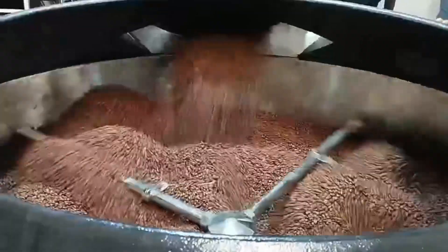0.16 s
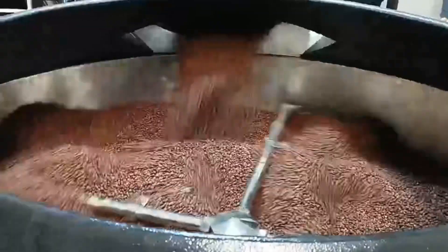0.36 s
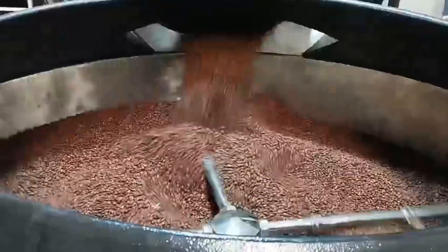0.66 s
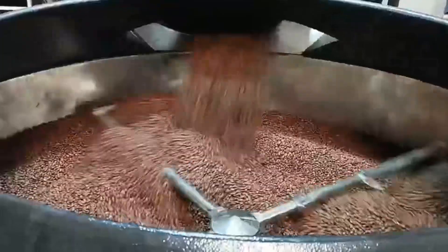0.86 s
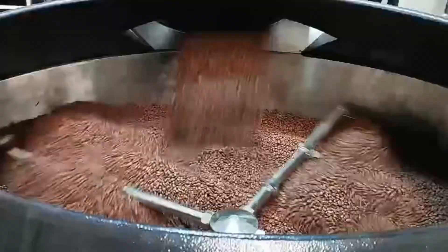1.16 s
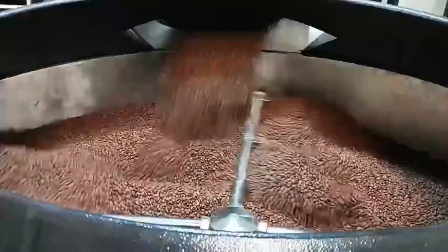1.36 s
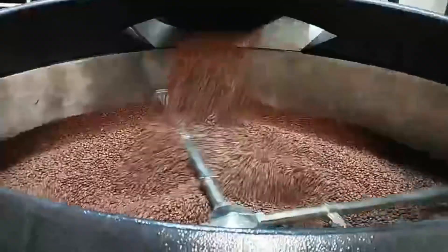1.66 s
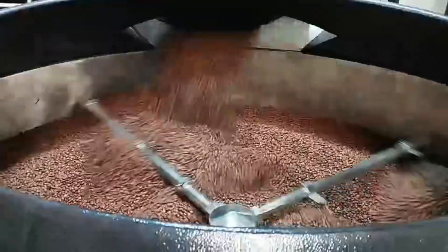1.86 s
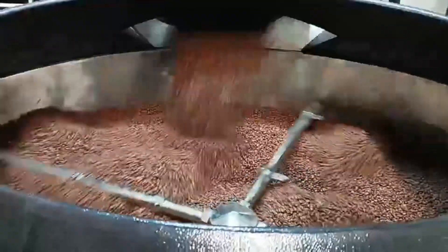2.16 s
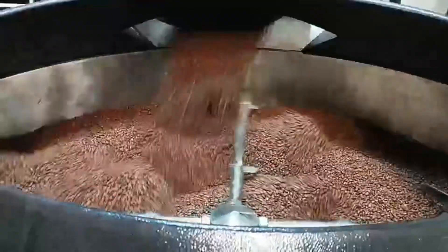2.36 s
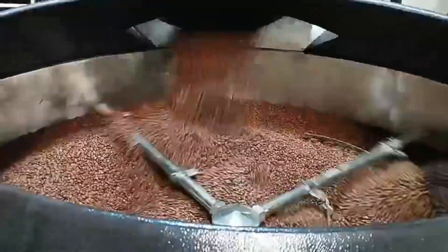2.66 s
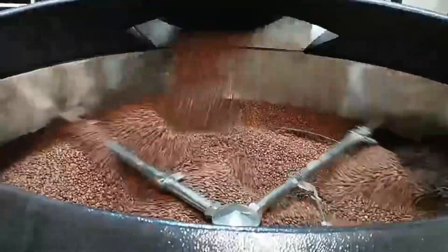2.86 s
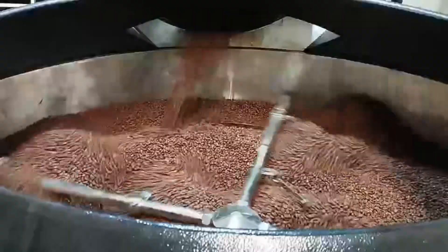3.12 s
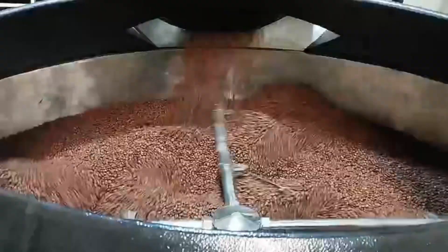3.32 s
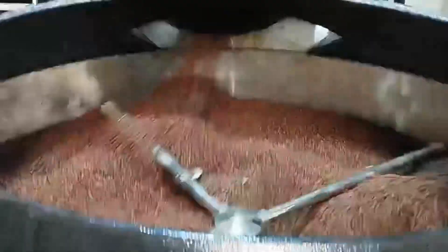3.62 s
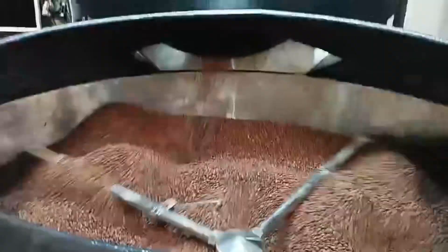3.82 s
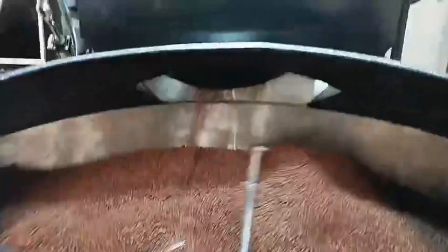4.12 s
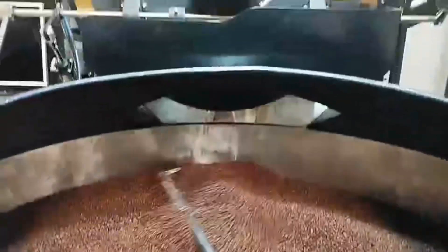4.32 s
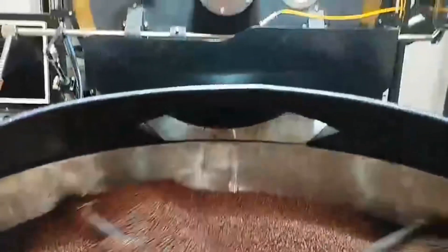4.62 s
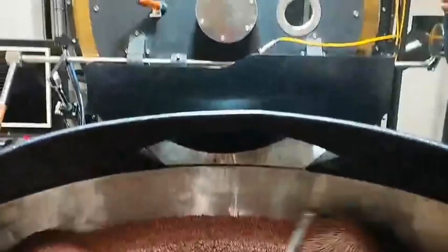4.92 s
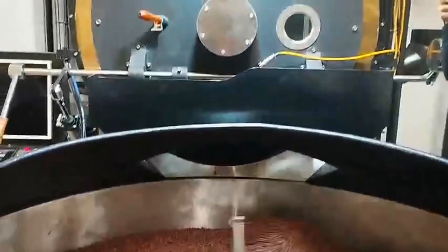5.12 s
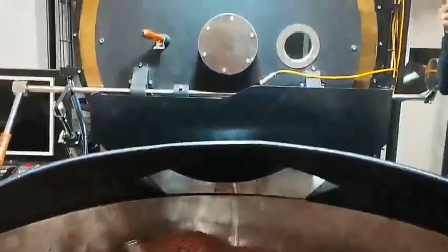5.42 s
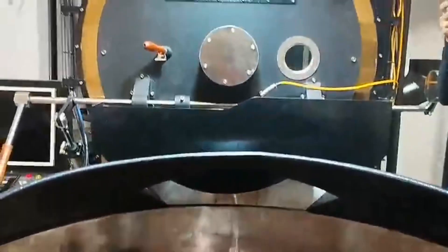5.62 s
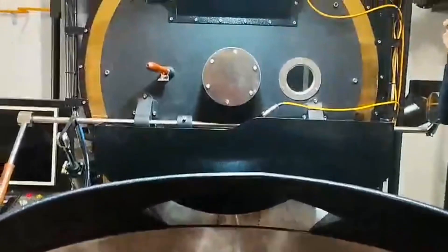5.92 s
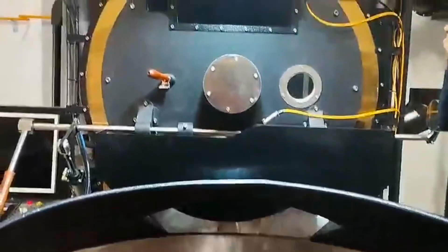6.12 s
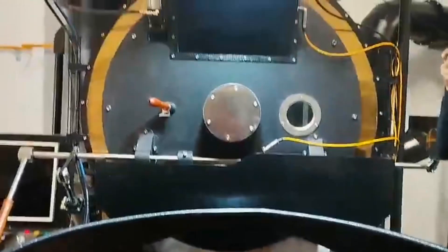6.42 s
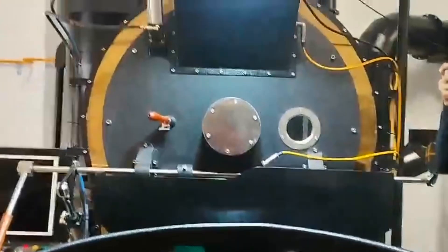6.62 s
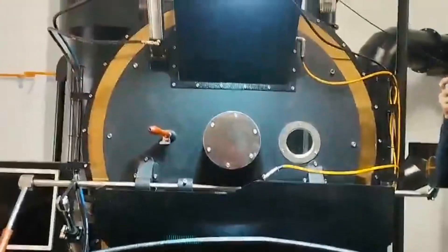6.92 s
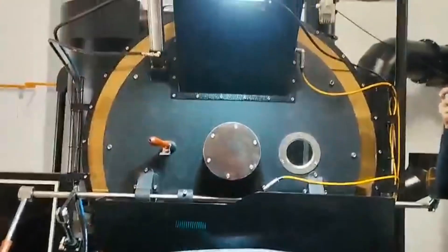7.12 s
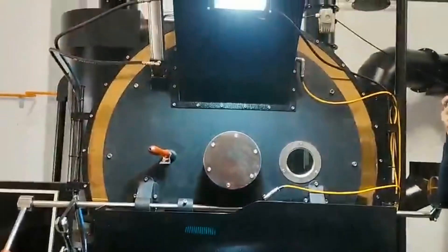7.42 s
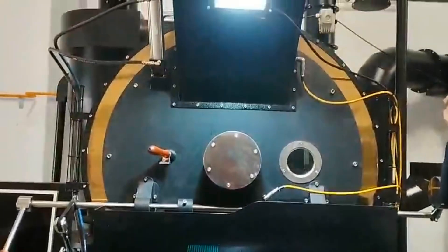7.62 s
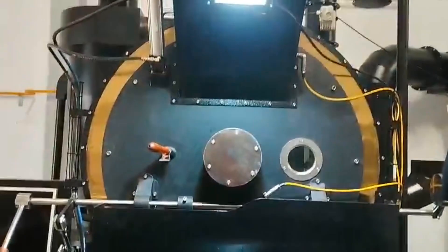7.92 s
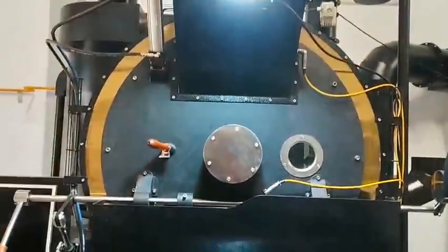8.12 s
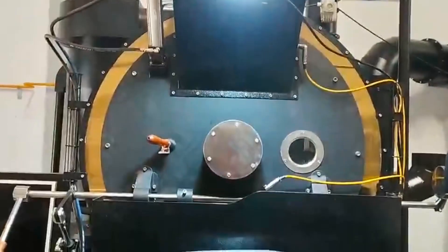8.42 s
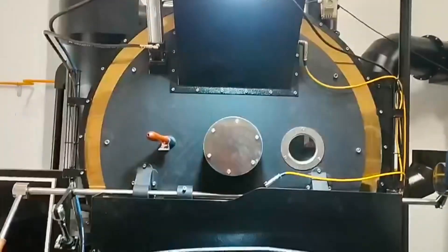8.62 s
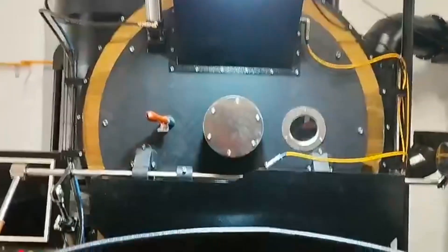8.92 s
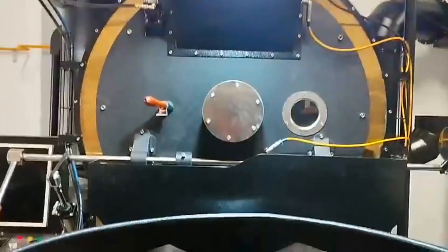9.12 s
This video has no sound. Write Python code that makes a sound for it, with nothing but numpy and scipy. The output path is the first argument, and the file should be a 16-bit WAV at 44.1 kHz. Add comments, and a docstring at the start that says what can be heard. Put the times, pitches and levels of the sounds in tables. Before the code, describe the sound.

Close to a big coffee roaster's cooling tray, a strong low fan hum throbs irregularly over booming air. Beans pour in with a rattling rush, thinning out by about five seconds, while stirring arms keep the heap roaring, hissing and ticking. Thin, high whistles flare midway. The handheld microphone tilts up from tray to drum, slightly softening the bean hiss and adding a hollow rush.

```python
"""In a coffee roastery, a large roaster empties its beans into a round steel cooling tray.
The cooling fan hums and throbs as a set of tones, and its air booms as noise shaped by the ducts.
Stirring arms push the beans round: the heap roars as tray-coloured noise, single beans tick and hiss
as thousands of random clicks, and thin whistles of narrow noise come and go.
The loud hum works the recorder's gain control, so the beans surge up just after each sag of the hum."""
import sys
import numpy as np
from scipy import signal
from scipy.fft import rfft, irfft
from scipy.io import wavfile
from scipy.ndimage import uniform_filter1d, minimum_filter1d, map_coordinates

SR = 44100
rng = np.random.default_rng(int(sys.argv[2]) if len(sys.argv) > 2 else 0)


def dump(signal):
    """Clip the signal to [-1, 1] and save it as 16-bit WAV at the path in sys.argv[1]."""
    limited = np.clip(np.atleast_2d(signal).T, -1, 1)
    pcm = np.round(limited * 32767).astype(np.int16)
    wavfile.write(sys.argv[1], SR, pcm)


N = 408785
TIME = np.arange(N) / SR  # seconds
HZ = np.fft.rfftfreq(N, 1 / SR)
SHAFT_HZ = 146 / 3  # turns of the fan per second
EDGE_HZ = 15780  # top of the recorded band


def amp(db):
    """Turns decibels into a gain."""
    return 10 ** (np.asarray(db) / 20)


def evened(x):
    """Scales a signal to an average strength (rms) of 1."""
    return x / np.sqrt(np.mean(x ** 2) + 1e-20)


def along(rows, axis=1):
    """Reads one column of a time table at every sample."""
    rows = np.asarray(rows)
    return np.interp(TIME, rows[:, 0], rows[:, axis])


def across(rows, axis=1):
    """Reads one column of a frequency table at every frequency, on a log pitch scale."""
    rows = np.asarray(rows)
    return np.interp(np.log(HZ + 1), np.log(rows[:, 0] + 1), rows[:, axis])


def bell(hz, width):
    """Gain of one resonance: 1 at its pitch, falling away on both sides."""
    return 1 / (1 + ((HZ - hz) / width) ** 2 * np.sqrt(2))


def body(base, modes):
    """Gain of a broad spectrum with resonances standing on it; their powers add."""
    broad = amp(across(base)) ** 2
    resonances = sum((amp(db) * bell(hz, width)) ** 2 for hz, width, db in modes)
    return np.sqrt(broad + resonances)


def drift(per_s):
    """A smooth random wander of rms 1, drawn through per_s random points a second."""
    knots = rng.standard_normal(4096)
    wander = map_coordinates(knots, [TIME[::64] * per_s], mode="wrap")
    return evened(wander).repeat(64)[:N]


def arch(s, length):
    """A smooth rise and fall of height 1 around the time s."""
    return np.exp(-(2 * (TIME - s) / length) ** 2)


# how alike left and right are: pitch_hz, likeness (-1 to 1)
LIKENESS = [(60, 1), (150, 1), (215, 0.87), (320, 0.92), (400, 1), (490, 0.23), (600, 0.97), (700, 0.53),
            (800, 0.77), (880, 0.61), (1000, 0.19), (1080, 0.58), (1180, 0.022), (3000, 0.05)]


def noise(gain):
    """Stereo noise with the given gain per Hz; the bass is alike on both sides."""
    a, b = rng.standard_normal((2, len(HZ))) + 1j * rng.standard_normal((2, len(HZ)))
    same = np.clip(across(LIKENESS), -1, 1)
    mid = a * np.sqrt((1 + same) / 2)
    side = b * np.sqrt((1 - same) / 2)
    left_right = np.array([mid + side, mid - side])
    return irfft(left_right * gain, N) * np.sqrt(N * SR) / 2


def standing_waves(depth_db, size=500):
    """Reflections between the steel walls give each ear its own fine, fixed ripple of colour."""
    ripple = uniform_filter1d(rng.standard_normal((2, len(HZ))), size=size, axis=1)
    return amp(depth_db * evened(ripple))


# where the microphone points: time_s, tilt (0 down at the tray to 1 up at the drum's face)
MICROPHONE_TILT = [(0, 0), (3.7, 0.1), (4.8, 0.42), (6.3, 0.87), (7.2, 1), (9.27, 1)]


def tilt():
    """The turn of the microphone from tray to drum, which fades sounds up or down."""
    return along(MICROPHONE_TILT)


# the blade tone swelling and sagging, before its fine flutter and trim: time_s, level_db
BLADE_HUM = [(0.32, -12.0), (0.48, -39), (0.53, -15.5), (0.83, -11.5), (0.92, -30), (0.96, -14),
             (1.5, -9.5), (1.66, -33), (1.81, -5), (1.87, -21.5), (2.12, -10.0), (2.24, -32), (2.39, -8),
             (2.65, -34.0), (2.74, -10.5), (2.78, -34.0), (2.89, -32), (2.93, -11), (3.42, -19.5),
             (3.46, -12.0), (3.56, -17.5), (3.79, -9), (3.91, -30), (4.04, -7.5), (4.1, -29), (4.22, -5.5),
             (4.31, -30), (4.4, -10.0), (4.74, -22), (4.99, -7.5), (5.3, -34.0), (5.38, -8.5), (5.64, -16),
             (6.01, -12.5), (6.07, -24), (6.36, -6.5), (6.5, -37), (6.61, -12), (6.77, -18.5), (7.55, -10),
             (7.58, -15.5), (7.73, -6.5), (7.82, -30), (8.24, -9.5), (8.48, -14), (8.73, -6.5), (8.78, -12),
             (9.17, -16)]
# the fan's weaker tones: multiple of the shaft speed, level_db before the slight stereo lean
FAN_ORDERS = [(1, -35.5), (5, -36.5), (6, -28.5), (10, -36.5), (28, -62)]


def fan(hum_db=0.1, wobble_rad=0.17, flutter_db=1, flutter_per_s=15, order_wobble_rad=0.19):
    """The blade tone, three times a turn, shaken by turbulence, over weaker shaft tones."""
    angle = 2 * np.pi * (SHAFT_HZ * TIME + rng.random())
    s, db = np.transpose(BLADE_HUM)
    throb = np.interp(TIME, s, amp(db))  # like beats: round tops and narrow dips
    flutter = amp(hum_db + flutter_db * drift(flutter_per_s))
    hum = throb * flutter * np.sin(3 * angle + wobble_rad * drift(13))
    orders = sum(amp(db) * np.sin(round(k) * angle + order_wobble_rad * drift(5))
                 for k, db in FAN_ORDERS)
    return np.sqrt(2) * (hum + orders) * amp([[.2], [-.2]])  # leans slightly left


# drones of the drum drive and casing, before swell and flutter: pitch_hz, level_db
DRONES = [(65.5, -27.5), (320.6, -23), (382, -31)]


def drones(draught_db, follow=0.7, wobble_rad=0.64, wobble_per_s=24, flutter_db=2.65):
    """Tones that waver in pitch and level; the higher ones also swell with the draught."""
    tones = 0
    for hz, db in DRONES:
        swell_db = follow * draught_db * (hz > 2 * SHAFT_HZ)
        level = amp(db + flutter_db * drift(wobble_per_s) + swell_db)
        wobble = wobble_rad * (drift(wobble_per_s) + 2 * drift(4))
        tones = tones + level * np.sin(2 * np.pi * hz * TIME + wobble)
    return np.sqrt(2) * tones * amp([[-.5], [.5]])


def stirrer(hz=501, level_db=-33.0, away_db=-7, wobble_rad=0.78):
    """The stirring motor sings from under the tray, fainter as the microphone turns away."""
    tone = np.sin(2 * np.pi * hz * TIME + wobble_rad * (drift(18) + 2 * drift(5)))
    level = amp(level_db + away_db * tilt() + 2 * drift(14))
    return np.sqrt(2) * tone * level * amp([[1], [-1]])


# broad rumble of the air: pitch_hz, level_db per Hz, before swell and stereo lean
RUMBLE = [(10, -62), (22, -51.5), (40, -41.5), (82, -41.5), (102, -50), (235, -44), (275, -50.5),
          (360, -55.5), (420, -65), (520, -56.5), (900, -100)]
# duct and casing resonances that the air excites: pitch_hz, width_hz, level_db per Hz
# (also before swell and stereo lean)
DUCTS = [(66.5, 5.1, -36.5), (123, 8.2, -42), (132.3, 22, -42), (146.4, 16, -38.5), (178.7, 1.2, -36),
         (195.4, 4.5, -37.5), (205, 7.3, -39.5), (304.1, 5, -38.5), (322.8, 20.8, -37.5), (378, 23.3, -44),
         (438, 8, -51.5), (489, 17, -53)]


def air(draught_db, follow=0.72, lean_db=0.56):
    """Turbulent air booms in the ducts; the casing's higher resonances swell with the draught."""
    gain = body(RUMBLE, DUCTS)
    deep = 1 / (1 + (HZ / 170) ** 8)  # share of the power below about 170 Hz
    casing = noise(gain * np.sqrt(1 - deep)) * amp(follow * draught_db)
    boom = noise(gain * np.sqrt(deep))
    return boom + casing * amp([[-lean_db], [lean_db]])


# the heap's dull roar: pitch_hz, relative_db per Hz
HEAP = [(200, -75), (430, -52.5), (640, -60), (1000, -60.5), (1200, -60.5), (1700, -62.5), (2100, -65.5),
        (2700, -75), (5000, -100)]
# resonances of the steel tray: pitch_hz, width_hz, relative_db per Hz
TRAY = [(533, 40, -51), (603, 23, -49.5), (671.6, 23, -49), (747, 36, -53.5), (783, 26, -51.5),
        (875, 31, -50), (966, 44, -55), (1077, 71, -55.5), (1273, 83, -59.5), (1357.5, 11, -51.5),
        (1506, 26, -56.5), (1645, 47, -62.5), (1833, 35, -60.5)]


def heap(push_db, level_db=-22.5, follow=0.89, churn_db=0.45, scrape_hz=1100, away_db=0.3):
    """The mass of beans tumbles as the arms push it and makes the tray ring; the upper part scrapes."""
    gain = body(HEAP, TRAY)
    upper = 1 / (1 + (scrape_hz / (HZ + 1)) ** 6)
    low = noise(gain * np.sqrt(1 - upper))
    high = noise(gain * np.sqrt(upper) * standing_waves(depth_db=0.56))
    roar = evened(low + high * amp(away_db * tilt()))
    return roar * amp(level_db + follow * push_db + churn_db * drift(70))


# an arm ploughs up beans that spill and spray: time_s at the top, length_s, added_db of fizz
SPILLS = [(.62, 0.34, 2.5), (1.422, 0.51, 2.5), (2.28, .15, 1), (2.658, 0.13, 2), (2.87, 0.12, 1.5),
          (3.603, 0.14, 3), (4.64, .25, 4), (5.3, 0.086, 2), (5.83, .12, 1), (7.73, .2, 4),
          (8.418, 0.49, 3)]


def spills():
    """Each ploughed-up wave of beans lifts the fizz in a smooth arch, given in dB."""
    return sum(db * arch(s, length) for s, length, db in SPILLS)


def ticks(per_s, spread_db, scatter_db, scatter_s):
    """Bean impacts of many sizes, followed by sprays of echoes off the tray wall."""
    size = amp(spread_db * np.minimum(rng.exponential(1, (2, N)), 5))
    struck = rng.random((2, N)) < per_s / SR
    hits = size * rng.choice([-1, 1], (2, N)) * struck
    keep = amp(-60 / (scatter_s * SR)) ** 2  # echo power falls 60 dB in scatter_s
    lingering = signal.lfilter([1 - keep], [1, -keep], (hits ** 2).mean(0))
    echoes = np.sqrt(lingering) * rng.standard_normal((2, N))
    return evened(hits + amp(scatter_db) * echoes)


# colour of the bean ticks at each ear: pitch_hz, left_relative_db per Hz, right_relative_db per Hz
TICK_COLOUR = [(900, -99, -86), (1900, -61.5, -73), (2610, -65.5, -72), (3600, -69.5, -69),
               (4550, -70, -66), (6140, -70, -72), (7520, -76, -73.5), (8350, -93, -82.5), (8900, -76, -82),
               (10000, -76.5, -79), (11040, -79.5, -93), (12100, -71.5, -86), (13700, -70.5, -74.5),
               (16200, -72, -85)]
# the stream from the chute, thinning as the drum empties: time_s, share of full flow
POUR = [(0, 1), (2.7, 0.84), (3.7, 0.49), (4.6, 0.073), (9.27, 0)]


def beans(push_db, spill_db, hiss_db=-32.0, fizz_db=-35.5, hiss_away_db=-2.5, fizz_away_db=-2.5,
          hiss_spill=.35, split_hz=9000, pour_db=-37.5, pour_hz=5800, pour_width_hz=2000,
          rattle_db=-38.5, rattle_hz=1850, rattle_width_hz=380):
    """Thousands of ticks a second merge into a hiss; high fizz, a pouring rush and a rattle join it.
    Hiss and fizz fade as the microphone turns away from the tray."""
    ears_db = [across(TICK_COLOUR, axis=1), across(TICK_COLOUR, axis=2)]
    colour = amp(ears_db) * standing_waves(depth_db=1.66)
    patter = rfft(ticks(per_s=6000, spread_db=2.5, scatter_db=0.6, scatter_s=0.071)) * colour
    top = 1 / (1 + (split_hz / (HZ + 1)) ** 8)
    hiss_level = amp(hiss_db + push_db + hiss_spill * spill_db + hiss_away_db * tilt())
    fizz_level = amp(fizz_db + push_db + spill_db + fizz_away_db * tilt())
    hiss = evened(irfft(patter * (1 - top), N)) * hiss_level
    fizz = evened(irfft(patter * top, N)) * fizz_level

    landing = rfft(ticks(per_s=1500, spread_db=2.5, scatter_db=1, scatter_s=.04)) * colour
    rush = evened(irfft(landing * bell(pour_hz, pour_width_hz), N)) * amp(pour_db)
    rattle = evened(irfft(landing * bell(rattle_hz, rattle_width_hz), N)) * amp(rattle_db)
    return hiss + fizz + (rush + rattle) * along(POUR)


# thin whistles of the machine: pitch_hz, width_hz, left_relative_db, right_relative_db
WHISTLES = [(4100, 14, -65, -68), (5730, 18, -62, -65), (6260, 20, -49, -62), (7705, 20, -57, -55),
            (10126, 30, -61, -63), (12893, 24, -46, -57), (13052, 30, -53, -63), (13255, 30, -54, -63)]
# the whistles flare up briefly: time_s at the top, length_s, gain_db
FLARES = [(4.0, .5, 0), (4.7, .6, 3), (5.3, 0.17, -5), (5.85, 0.32, 2), (6.7, .12, -3), (7.78, .12, 0)]


def whistles(rest_db=-7.0, away_db=-7.0):
    """Narrow bands of noise sound as unsteady high tones, faint between their flares."""
    gain = sum(amp([[left], [right]]) * bell(hz, width) / np.sqrt(width)
               for hz, width, left, right in WHISTLES)
    flares = sum(amp(db) * arch(s, length) for s, length, db in FLARES)
    rest = amp(rest_db + away_db * tilt())
    return noise(gain) * np.hypot(rest, flares)


def drum(level_db=-34.5, hz=1020, width_hz=130):
    """A hollow rush from the drum's steel face, heard as the microphone turns up to it."""
    return evened(noise(bell(hz, width_hz))) * amp(level_db) * tilt()


def scene(gust_db=1.6, gusts_per_s=9, stir_db=0.42, stirs_per_s=10):
    """Fan, drives, air and beans together; the draught and the push of the arms wander at random."""
    draught_db = gust_db * drift(gusts_per_s)
    push_db = stir_db * drift(stirs_per_s)
    machine = fan() + drones(draught_db) + stirrer() + air(draught_db) + whistles() + drum()
    return machine + heap(push_db) + beans(push_db, spills())


def gain_control(x, aim_db=-10.0, share=0.84, recover_db_per_s=80, lag_s=.05):
    """Turns everything down when the hum swells and up when it sags, so the beans seem to surge."""
    power = abs(uniform_filter1d((x ** 2).mean(0), size=900))
    over_db = 10 * np.log10(power + 1e-12) - aim_db
    fall = recover_db_per_s * TIME
    held_db = np.maximum.accumulate(over_db + fall) - fall  # rises at once, falls no faster than set
    keep = np.exp(-1 / (lag_s * SR))
    smooth_db = signal.lfilter([1 - keep], [1, -keep], held_db)
    return x * amp(-share * smooth_db)


def record(dry, ceiling=0.92):
    """Gain control, a quick limiter on the highest peaks, then a cut of everything above the band."""
    levelled = gain_control(dry)
    room_left = np.minimum(1, ceiling / (abs(levelled).max(0) + 1e-9))
    limited = levelled * uniform_filter1d(minimum_filter1d(room_left, size=700), size=700)
    low_pass = signal.firwin(1023, EDGE_HZ, window=("kaiser", 9), fs=SR)
    return signal.oaconvolve(limited, low_pass[None], "same")


dry = scene()
out = record(dry)
dump(out)
```